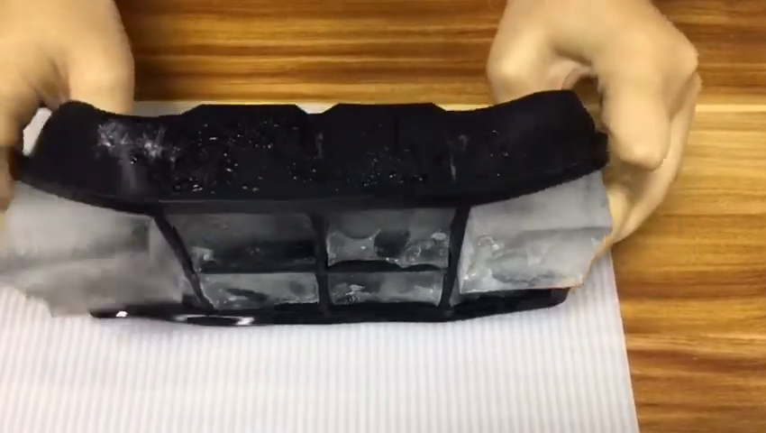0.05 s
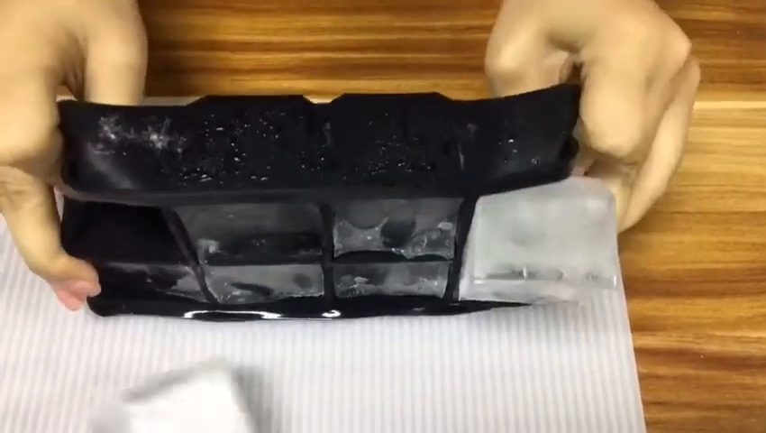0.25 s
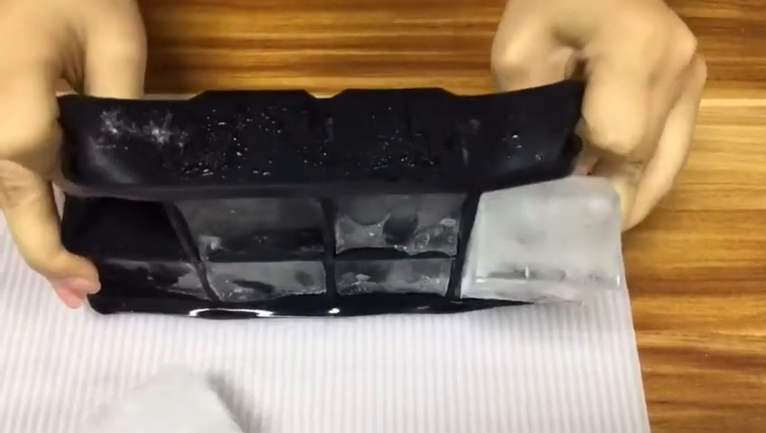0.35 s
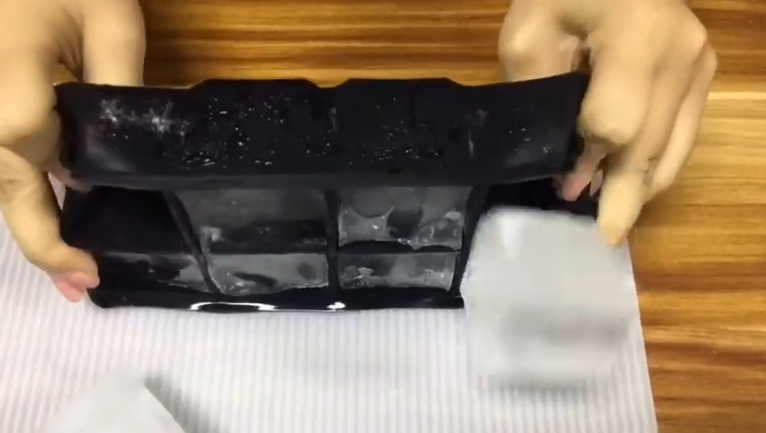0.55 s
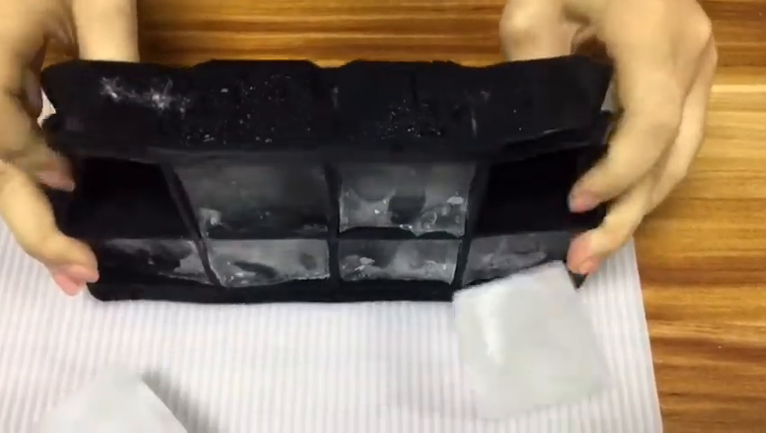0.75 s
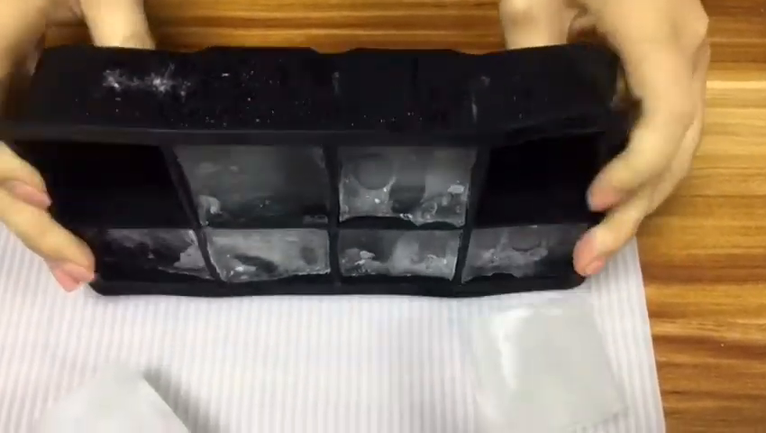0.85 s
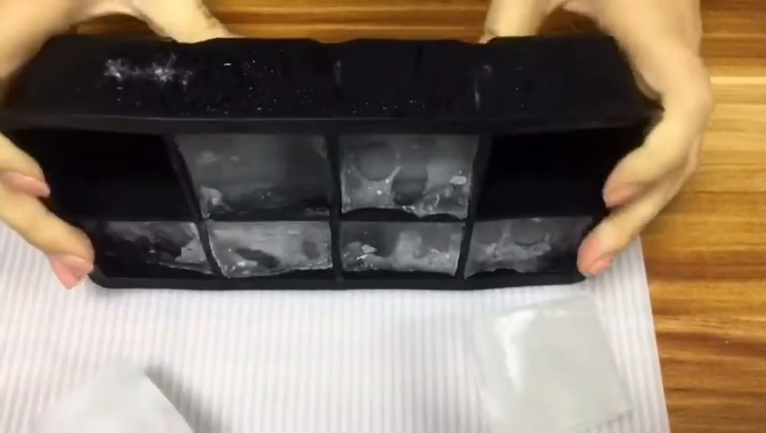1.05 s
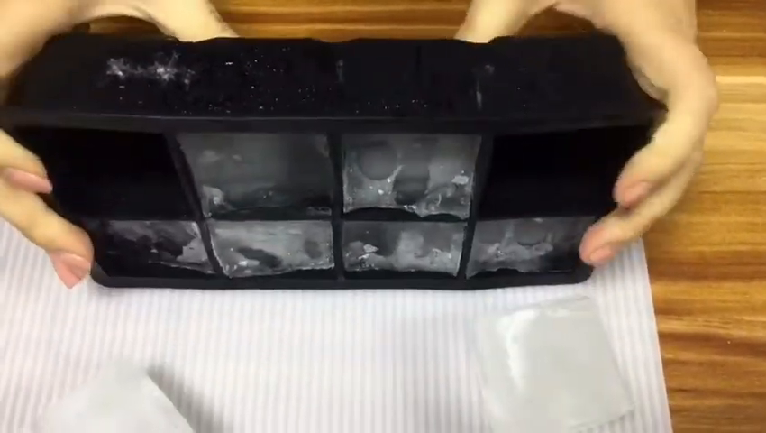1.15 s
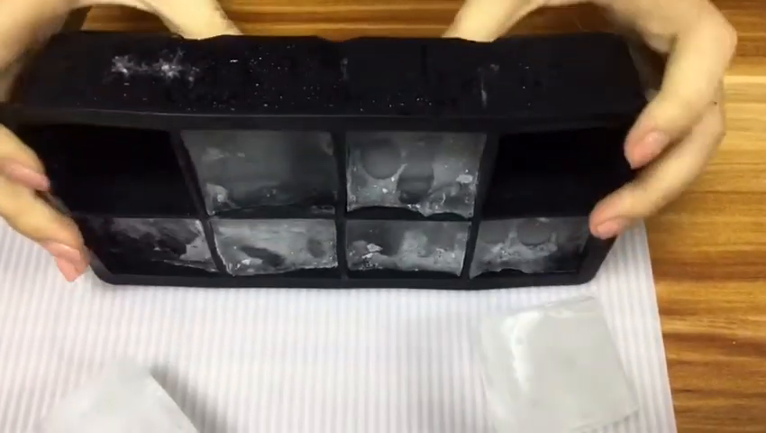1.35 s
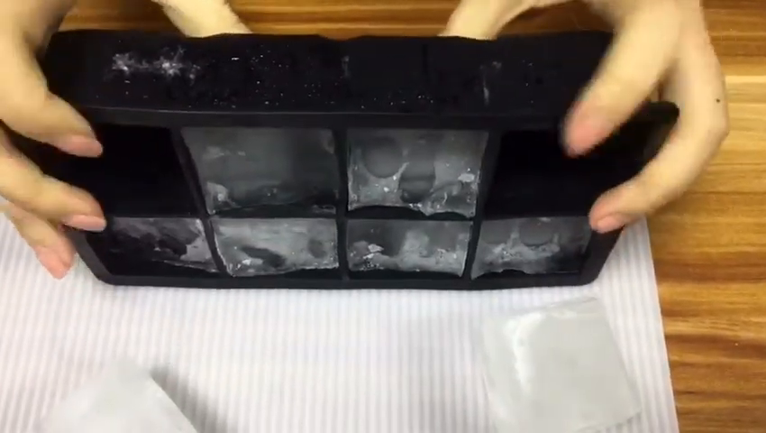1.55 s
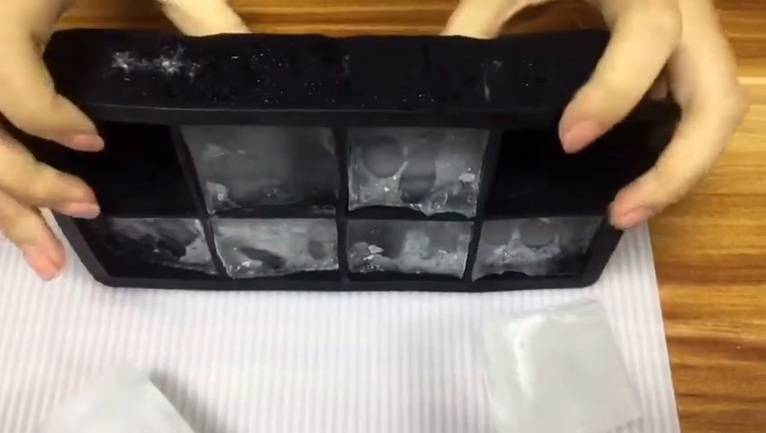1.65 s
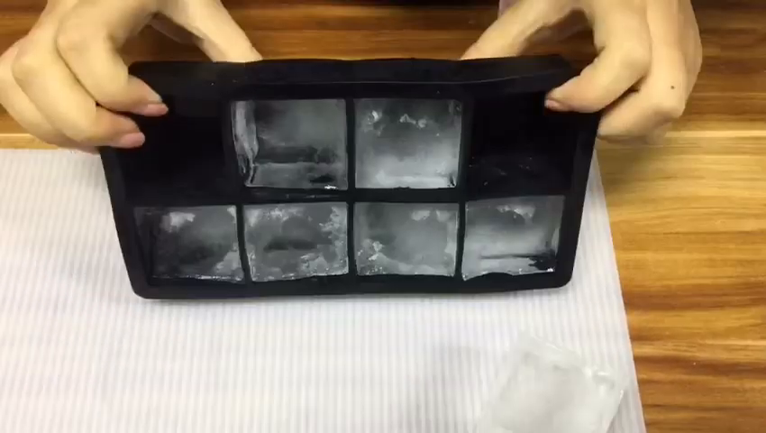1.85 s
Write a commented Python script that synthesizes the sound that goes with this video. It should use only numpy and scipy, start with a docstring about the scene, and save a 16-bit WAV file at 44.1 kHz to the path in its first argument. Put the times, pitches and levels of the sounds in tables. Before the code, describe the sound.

Two ice cubes drop from a silicone tray, clacking and thudding onto a table.

```python
"""Two ice cubes drop from a silicone tray onto a cloth-covered wooden table, close by, in a small room.
Each lands on an edge, slaps flat and tumbles to rest: the ice clacks, the table top booms.
The wet tray hisses and rubs as the first cube slides out, bumps as it flexes and ticks as it relaxes.
Underneath: a murmur of air, a thin electrical whine and a faint hiss that swells, then drops at 1.1 s."""
import sys
import numpy as np
from scipy import signal
from scipy.io import wavfile

SR = 44100
rng = np.random.default_rng(int(sys.argv[2]) if len(sys.argv) > 2 else 0)


def store_pcm(level_fs):
    """Save levels as 16-bit WAV."""
    pcm = np.round(np.clip(level_fs, -1, 1) * 32767).astype(np.int16)
    wavfile.write(sys.argv[1], SR, np.atleast_2d(pcm).T)


N = 83790
TIME = np.arange(N) / SR

# Noise spectra. Each row: frequency in Hz, relative density in dB.
AIR_SPECTRUM = [(25, -3.5), (60, 1.5), (110, 7), (200, 3), (300, -8), (400, -9.5), (800, -17.5),
                (1600, -17), (3000, -31.5), (6000, -42.5), (11000, -42.5), (16000, -42)]
HISS_FLOOR_SPECTRUM = [(300, 9.5), (1200, 7), (3000, 0.5), (6000, -0.5), (10000, -11.5), (16000, -2.5)]
SLIDE_SPECTRUM = [(400, 6.5), (1200, 0.5), (3000, 3.5), (4500, 16), (7500, 14.5), (9500, 17.5), (11500, 9),
                  (16000, 8.5)]
RUB_SPECTRUM = [(200, -20), (450, 5.5), (750, -3), (1250, -0.5), (2200, -22), (5000, -24.5), (14000, -38)]
FLEX_SPECTRUM = [(25, -15), (40, -9.5), (55, -0.5), (90, -1.5), (130, 2.5), (250, -18), (600, -62)]
# Noise envelopes. Each row: time in seconds, level in dB.
HISS_FLOOR_ENVELOPE = [(.2, -56.5), (.3, -64.5), (.6, -70), (.85, -57.5), (1.08, -60.5), (1.11, -71),
                       (1.85, -75)]
SLIDE_ENVELOPE = [(0, -73), (.085, -99), (.115, -51.5), (.16, -55), (.178, -66), (.23, -86)]
FLEX_ENVELOPE = [(0, -74), (.10, -63.5), (.16, -41.5), (.2, -46), (.225, -46), (.4, -40), (.6, -41.5),
                 (.9, -45), (1.1, -52), (1.4, -61.5), (1.7, -59), (1.85, -64.5)]
SCRAPE_ENVELOPE = [(0, -63.5), (.13, -65.5), (.21, -77.5), (.25, -94)]
# Room tail. Each row: frequency in Hz, level in dB re direct sound, T60 in seconds.
ROOM_BANDS = [(58.3, -14, 0.68), (151, -7.5, 0.23), (306, -9, 1), (625, -9, 0.86), (1227, -11.5, 0.4),
              (2430, -14.5, 0.66), (3600, -13, .4), (5900, -12, 0.33), (14130, -21.5, 0.21)]
# Judder along the rim. Each row: centre in seconds, half length in seconds, level in dB.
RIM_RUBS = [(0.152, 0.013, -42), (1.277, 0.043, -63.5)]
# Tray bumps. Each row: start in seconds, level in dB, frequency in Hz.
TRAY_BUMPS = [(0.173, -29, 85), (0.401, -24, 90), (.442, -20, 125), (.530, -24.5, 131), (.869, -22.5, 105)]
# Snaps and clinks. Each row: start in seconds, peak in dB, centre in Hz, sharpness as Q.
WET_TICKS = [(0.031, -35, 9200, .9), (0.1399, -31, 1090, 0.79), (.1607, -30.5, 2680, 0.84),
             (0.194, -45.5, 1300, 1.9), (0.243, -35, 8400, 12), (.2450, -19, 1780, 5.8),
             (0.436, -25.5, 2020, 4.3), (0.4508, -24.5, 3330, 2.1), (0.618, -35, 5960, 0.4),
             (0.6828, -18.5, 3660, 7.2), (0.6841, -20.5, 5800, 3.8), (0.6911, -11, 2230, 2.6),
             (0.6922, -21, 5960, 5.2), (0.8327, -30.5, 2170, 2.35), (0.85, -36.5, 3400, 5.7),
             (0.868, -23.5, 2070, 6.5), (0.869, -31.5, 5600, 7.7), (1.0655, -41, 5500, 0.61),
             (1.064, -47, 1798, 9.9)]
# Table top modes. Each row: frequency in Hz, T60 in seconds, level in dB struck left, then right.
WOOD_MODES = [(87.6, 0.4, -19.5, -23.5), (106.67, 1.4, -44.5, -37.5), (141.1, 0.25, -28, -32),
              (153, 0.025, -5, -16.5), (173.7, 0.77, -35, -23.5), (184.33, 0.88, -19.5, -30),
              (232.6, 0.52, -28.5, -22), (248.1, 0.14, -39.5, -30), (255.5, 0.041, -23.5, -3),
              (297.7, 0.27, -22, -42.5), (347.4, 0.25, -24, -23.5), (373.6, 0.51, -30.5, -37),
              (440, 0.12, -26.5, -30), (496.3, 0.56, -39, -42.5), (604, 0.02, -17.5, -25.5),
              (700, 0.073, -33.5, -32.5), (787, 0.022, -30, -40.5)]
# Ice on the table. Each row: frequency in Hz, level in dB, T60 in seconds.
CLACK_MODES = [(1410, -18.5, 0.0098), (1814, -21, 0.0099), (2133, -9, 0.0082), (2450, -16, 0.017),
               (2773, -19.5, .011), (3390, -14, 0.011), (3950, -16.5, 0.0068), (5700, -16, 0.0049),
               (6400, -18, .006), (8200, -23, 0.0051), (9500, -17, 0.0036), (13000, -15.5, .003)]
# Cube touches. Each row: start in seconds, clack gain in dB, clack low-pass in Hz, thud gain in dB,
# side of the table (0 left, 1 right).
CUBE_CONTACTS = [(0.2405, -4, 2350, -14, 0), (0.2427, -21, 12500, 0, 0), (0.2457, -10.5, 1650, -12, 0),
                 (0.3208, -23.5, 2490, -14.5, 0), (0.396, -19.5, 2800, -14.5, 0),
                 (0.4345, -12.5, 2600, -15, 0), (0.439, -18.5, 2400, -16.5, 0), (0.4498, -12, 3800, -28, 0),
                 (.4670, -19, 2920, -16.5, 0), (0.4991, -19, 2900, -25.5, 0), (0.5148, -20, 5403, -21, 0),
                 (0.5231, -18, 3340, -19.5, 0), (.5490, -23, 2900, -23, 0), (0.553, -23, 3440, -24.5, 0),
                 (0.6831, -3, 7200, -8.5, 1), (0.6851, -8.5, 13030, 0.5, 1), (0.6913, -12, 6070, -12, 1),
                 (0.6930, -30.5, 3052, -4, 1), (0.746, -30, 2530, -24.5, 1), (0.758, -31, 3320, -20, 1),
                 (0.777, -42, 1980, -16.5, 1), (0.7857, -58.5, 2400, -16.5, 1), (0.8317, -35, 2800, -27, 1),
                 (0.848, -31.5, 4000, -25.5, 1), (0.8588, -33, 3000, -21, 1), (0.867, -17, 3600, -25, 1),
                 (0.8697, -18.5, 4530, -15.5, 1)]


def from_db(db):
    """Decibels to gain."""
    return 10 ** (np.asarray(db) / 20)


def unit_rms(x):
    """Scale to rms 1."""
    return x / np.sqrt(np.mean(x ** 2) + 1e-20)


def envelope(rows):
    """Gain over time from (s, dB) points."""
    return from_db(np.interp(TIME, *np.transpose(rows)))


def at_hz(rows, hz, column=1):
    """Read a table column on a log-frequency axis."""
    rows = np.array(rows)
    return np.interp(np.log(hz), np.log(rows[:, 0]), rows[:, column])


def decay(t60_s, size=N):
    """Exponential decay."""
    return from_db(-60 * TIME[:size] / t60_s)


def burst(t60_s, size=N):
    """Decaying white noise."""
    return rng.standard_normal(size) * decay(t60_s, size)


def butter(x, hz, kind, order=2):
    """Causal Butterworth filter."""
    sos = signal.butter(order, np.clip(hz, 10, .47 * SR), kind, fs=SR, output="sos")
    return signal.sosfilt(sos, x + 1e-18)


def add(out, start_s, sound):
    """Mix a sound in at a time."""
    start = max(int(start_s * SR), 0)
    out[start:start + len(sound)] += sound[:N - start]


def noise_bands():
    """Half-octave bands of white noise as (centre Hz, band)."""
    edges_hz = 22 * 2 ** np.arange(0, 10, .5)
    return [(np.sqrt(lo * hi), butter(rng.standard_normal(N + SR), [lo, hi], "band", order=3)[SR:])
            for lo, hi in zip(edges_hz, edges_hz[1:])]


def coloured(spectrum):
    """Noise with a given spectrum, rms 1."""
    return unit_rms(sum(from_db(at_hz(spectrum, hz)) * band for hz, band in noise_bands()))


def narrow_noise(centre_hz, width_hz):
    """One band of noise, rms 1."""
    edges_hz = [centre_hz - width_hz / 2, centre_hz + width_hz / 2]
    return unit_rms(butter(rng.standard_normal(N), edges_hz, "band"))


def background(air_db=-52.5, whine_db=-83.5):
    """Steady murmur of air with a thin electrical whine."""
    whine = narrow_noise(centre_hz=9470, width_hz=180)
    return from_db(air_db) * coloured(AIR_SPECTRUM) + from_db(whine_db) * whine


def hiss_floor():
    """Faint background hiss: dips, swells, then drops at 1.1 s."""
    return envelope(HISS_FLOOR_ENVELOPE) * coloured(HISS_FLOOR_SPECTRUM)


def room(x, near_db=-14, delay_s=0.006):
    """Quick scatter from nearby things, then a diffuse tail that dies soonest in the high treble."""
    scatter = butter(rng.standard_normal(N), 350, "high") * decay(t60_s=0.15)
    near = from_db(near_db) * unit_rms(scatter)
    tail = sum(from_db(at_hz(ROOM_BANDS, hz)) * band * unit_rms(decay(at_hz(ROOM_BANDS, hz, column=2)))
               for hz, band in noise_bands())
    out = np.zeros(N)
    add(out, delay_s, signal.fftconvolve(x, (near + tail) / np.sqrt(N))[:N])
    return out


def tray(slips_per_s=2500):
    """Ice or fingers judder on the rim, ice hisses on wet silicone, flexing rumbles."""
    slips = (rng.random(N) < slips_per_s / SR) * rng.exponential(1, N)
    grain = unit_rms(signal.fftconvolve(slips, decay(t60_s=0.0066))[:N])
    strokes = sum(from_db(db) * np.exp(-.5 * ((TIME - centre_s) / half_s) ** 2)
                  for centre_s, half_s, db in RIM_RUBS)
    rub = strokes * grain * coloured(RUB_SPECTRUM)
    hiss = envelope(SLIDE_ENVELOPE) * coloured(SLIDE_SPECTRUM)
    rumble = envelope(FLEX_ENVELOPE) * coloured(FLEX_SPECTRUM)
    return rub + hiss + rumble


def scrape():
    """An icy edge drags along the wet tray wall: a narrow, high hiss."""
    return envelope(SCRAPE_ENVELOPE) * narrow_noise(centre_hz=9000, width_hz=1200)


def bumps(low_cut_hz=35):
    """The soft tray springs back or meets the table with a low, damped swing."""
    out = np.zeros(N)
    for start_s, db, hz in TRAY_BUMPS:
        add(out, start_s, from_db(db) * np.sin(2 * np.pi * hz * TIME) * decay(t60_s=.12))
    return butter(out, low_cut_hz, "high")


def ticks(t60_s=0.007):
    """Wet ice and silicone snap and clink: a short burst into one resonance."""
    out, size = np.zeros(N), SR // 20
    for start_s, peak_db, hz, q in WET_TICKS:
        spread = 1 + .5 / q
        tick = butter(burst(t60_s, size), [hz / spread, hz * spread], "band")
        add(out, start_s, from_db(peak_db) * tick / np.abs(tick).max())
    return out


def table_top(cloth_hz=972, hardening=0.5, low_cut_hz=85):
    """Each touch drives the wood's modes through the cloth, in a mix set by where it lands."""
    rings = sum(from_db([[left_db], [right_db]]) * np.sin(2 * np.pi * hz * TIME) * decay(t60_s)
                for hz, t60_s, left_db, right_db in WOOD_MODES)
    out = np.zeros(N)
    for start_s, _, _, thud_db, side in CUBE_CONTACTS:
        force = from_db(thud_db)
        cutoff_hz = cloth_hz * force ** hardening  # harder touches are shorter, so brighter
        add(out, start_s, force * butter(rings[side], cutoff_hz, "low", order=4))
    return butter(out, low_cut_hz, "high", order=4)


def ice_cubes():
    """Each touch crushes frost, rings the ice briefly and snaps a chip off the wet edge."""
    frost_db, frost_t60_s = -15, .01
    scatter_db, detune = 3, 0.03  # from touch to touch
    snap_db, snap_t60_s, snap_cutoff_hz = -19.5, .003, 8000  # bright however soft the touch
    low_cut_hz = 1120  # a small cube radiates no bass
    out, size = np.zeros(N), SR // 20
    for start_s, clack_db, cutoff_hz, _, _ in CUBE_CONTACTS:
        body = from_db(frost_db) * burst(frost_t60_s, size)
        for hz, db, t60_s in CLACK_MODES:
            level_draw, pitch_draw = rng.standard_normal(2)
            mode_hz = hz * (1 + detune * pitch_draw)
            wave = np.sin(2 * np.pi * mode_hz * TIME[:size]) * rng.choice([-1, 1])
            body += from_db(db + scatter_db * level_draw) * wave * decay(t60_s, size)
        body = butter(body, cutoff_hz, "low", order=3)
        snap = from_db(snap_db) * butter(burst(snap_t60_s, size), snap_cutoff_hz, "low")
        add(out, start_s, from_db(clack_db) * butter(body + snap, low_cut_hz, "high", order=4))
    return out


def scene(faces=3, ice_send_db=0.5):
    """Cubes, table and tray, mono; each face of a cube sends its own clack to the walls."""
    clacks, boom = ice_cubes(), table_top()
    ice_reverb = from_db(ice_send_db) * sum(room(ice_cubes()) for _ in range(faces)) / np.sqrt(faces)
    impacts = clacks + ice_reverb + boom + room(boom)
    return (impacts + tray() + hiss_floor() + scrape() + bumps() + ticks() + background())[None]


def record(dry, end_s=1.849, cutoff_hz=17000):
    """Gate shut just before the end, then a steep low-pass."""
    low_pass = signal.cheby2(14, 70, cutoff_hz, fs=SR, output="sos")
    return signal.sosfilt(low_pass, dry * (TIME < end_s) + 1e-18)


dry = scene()
out = record(dry)
store_pcm(out)
```